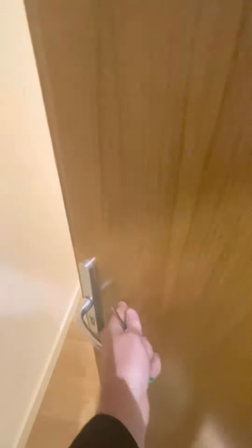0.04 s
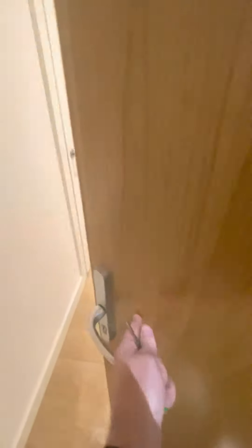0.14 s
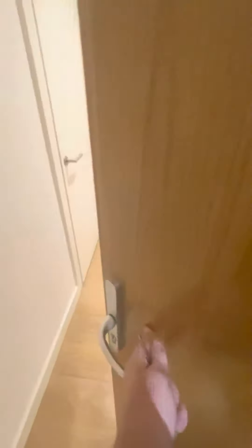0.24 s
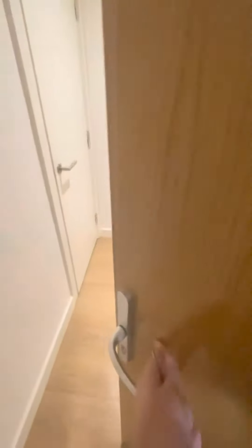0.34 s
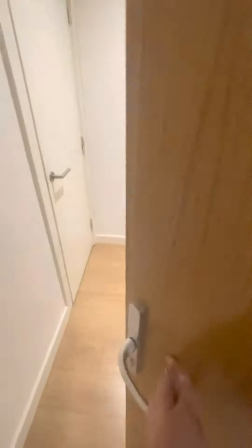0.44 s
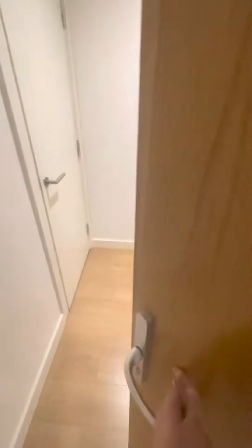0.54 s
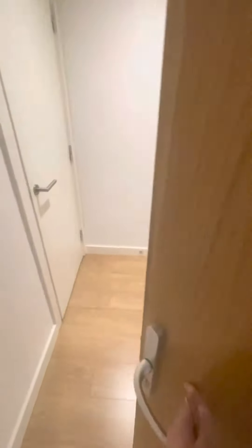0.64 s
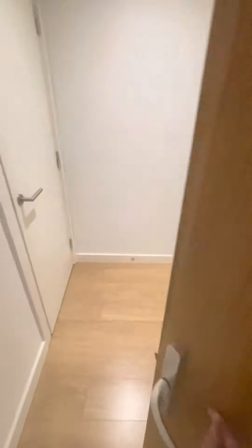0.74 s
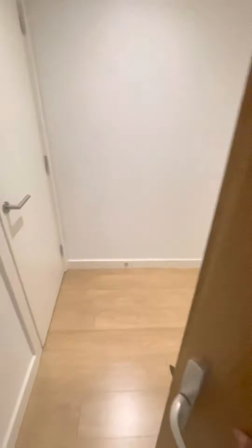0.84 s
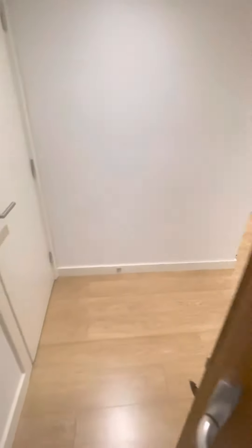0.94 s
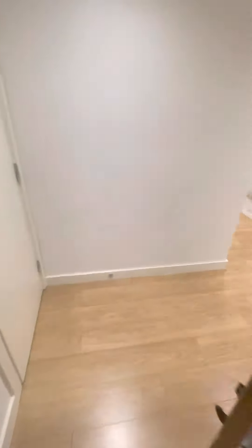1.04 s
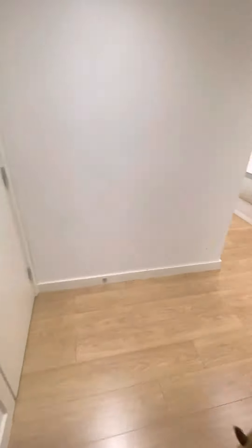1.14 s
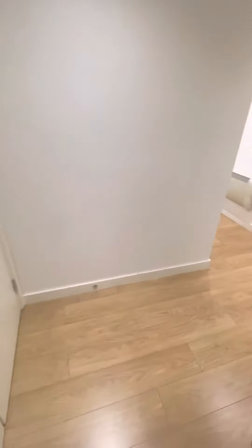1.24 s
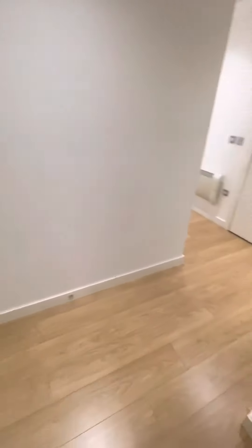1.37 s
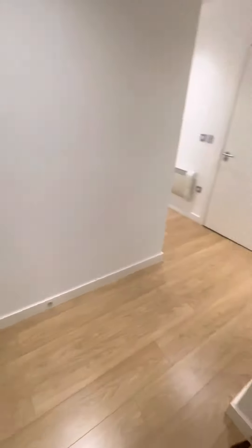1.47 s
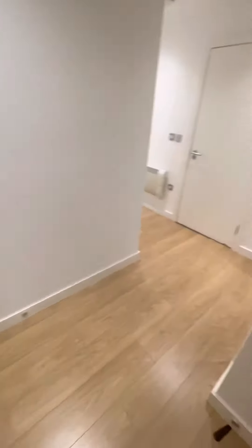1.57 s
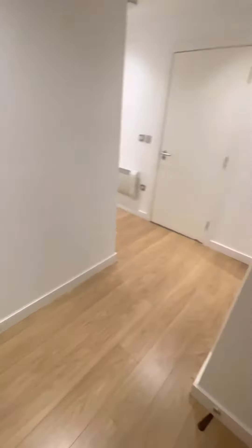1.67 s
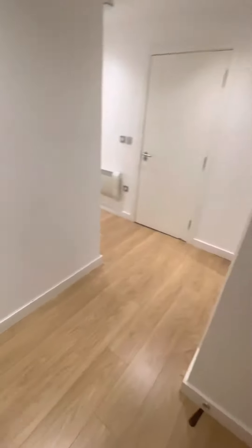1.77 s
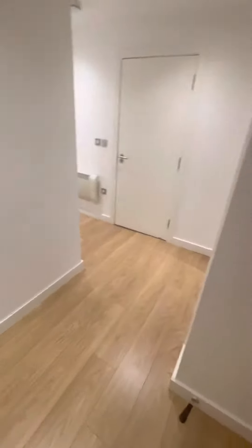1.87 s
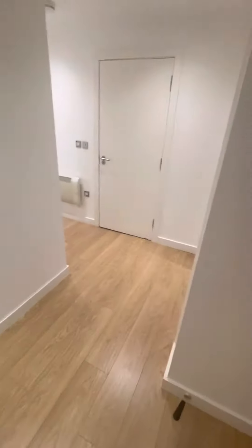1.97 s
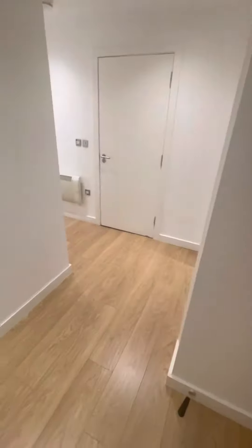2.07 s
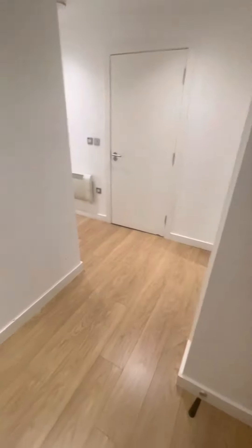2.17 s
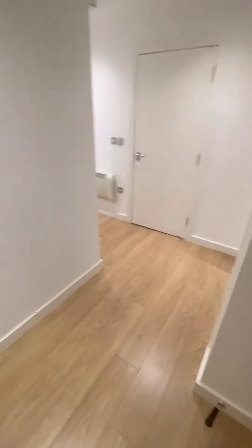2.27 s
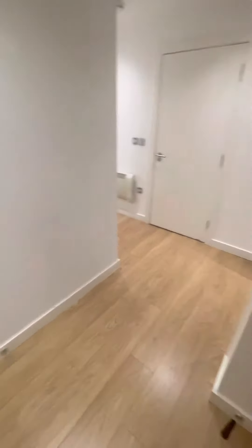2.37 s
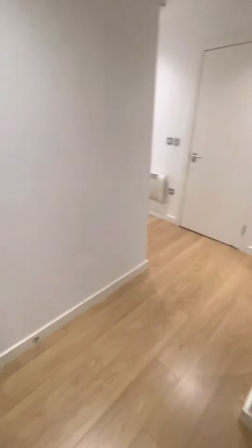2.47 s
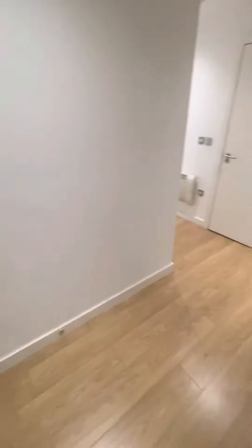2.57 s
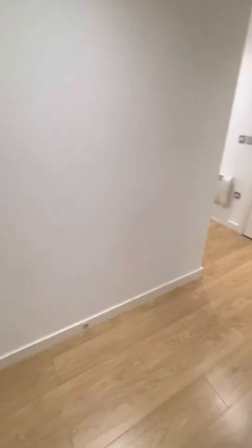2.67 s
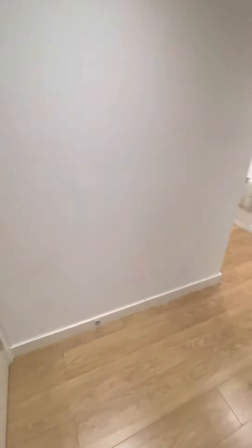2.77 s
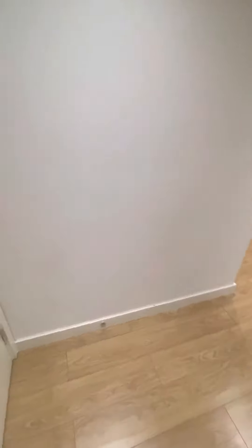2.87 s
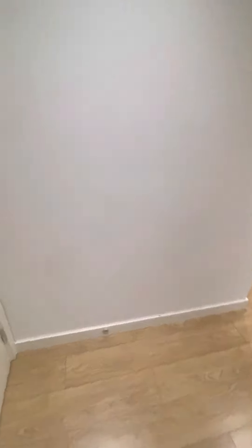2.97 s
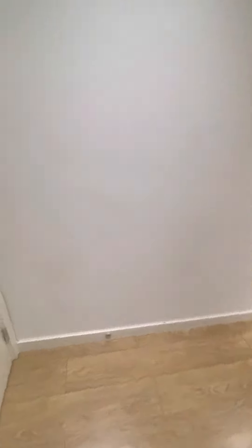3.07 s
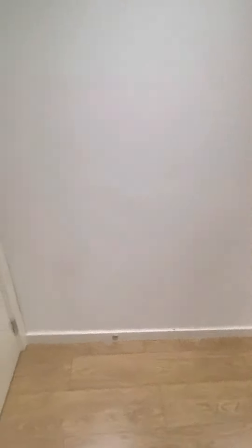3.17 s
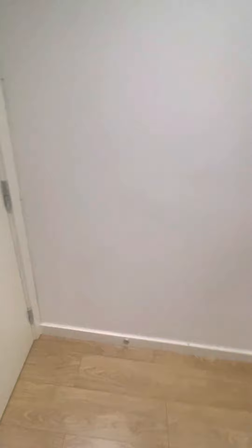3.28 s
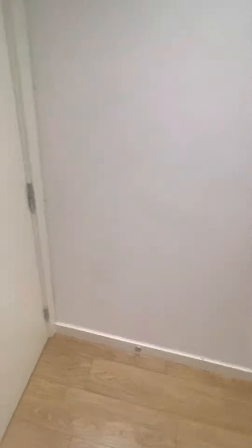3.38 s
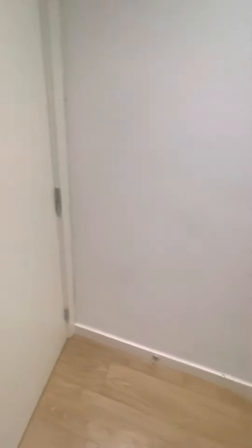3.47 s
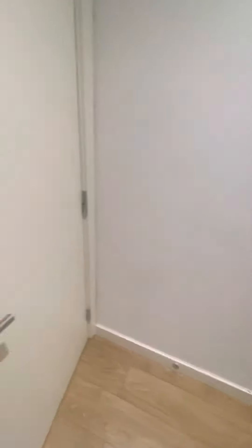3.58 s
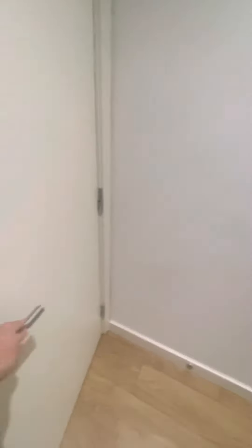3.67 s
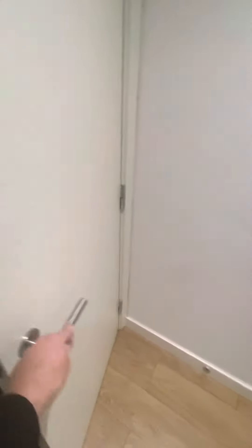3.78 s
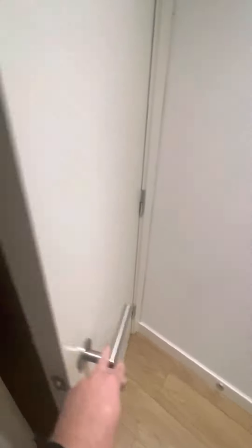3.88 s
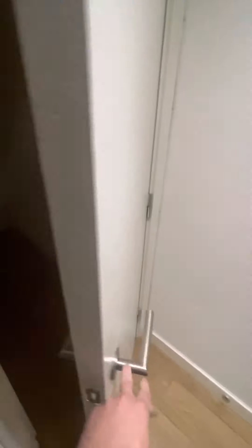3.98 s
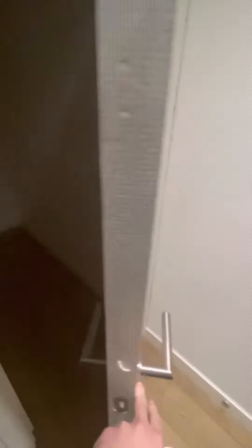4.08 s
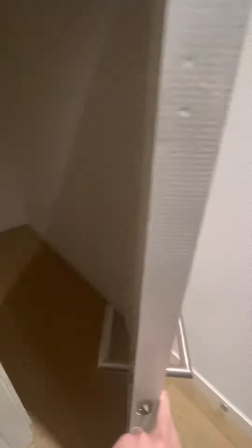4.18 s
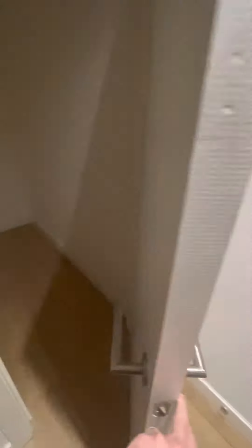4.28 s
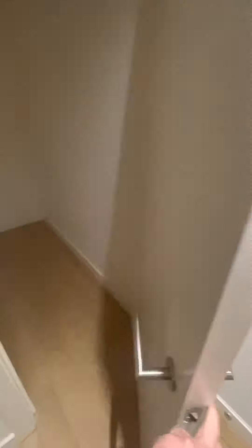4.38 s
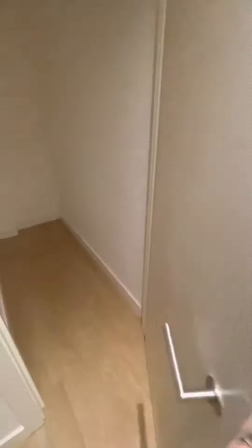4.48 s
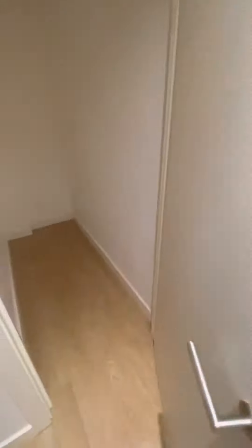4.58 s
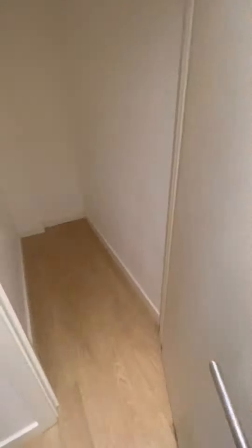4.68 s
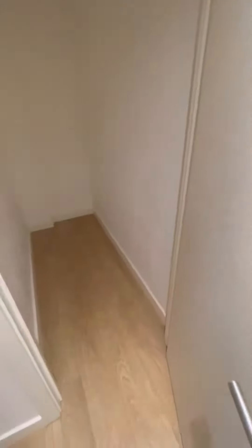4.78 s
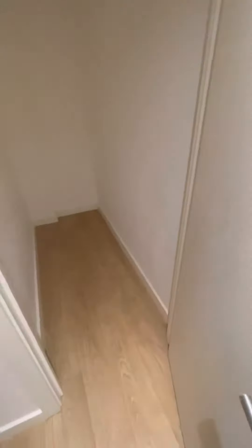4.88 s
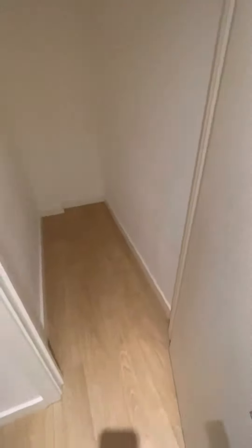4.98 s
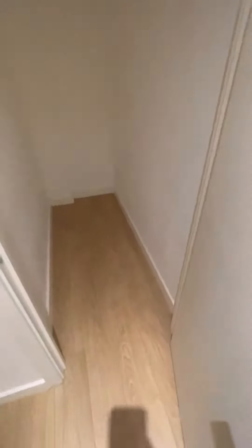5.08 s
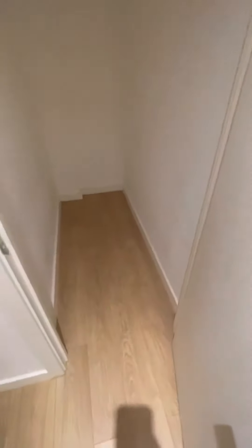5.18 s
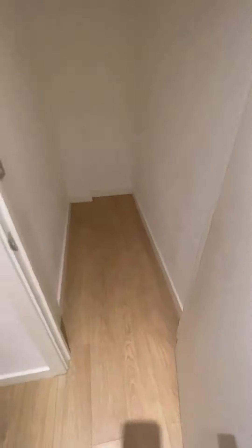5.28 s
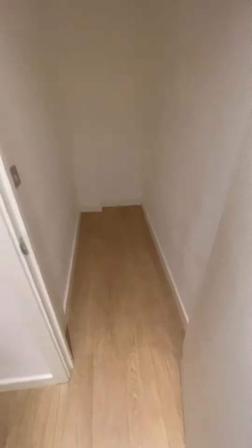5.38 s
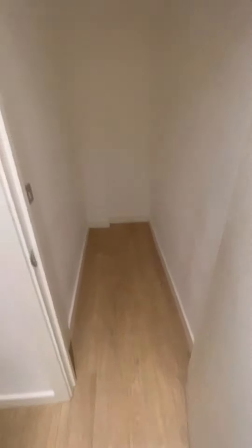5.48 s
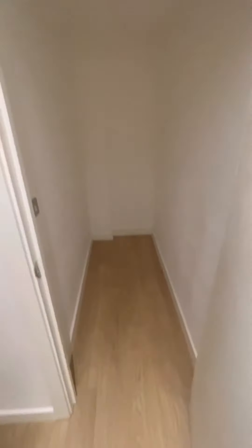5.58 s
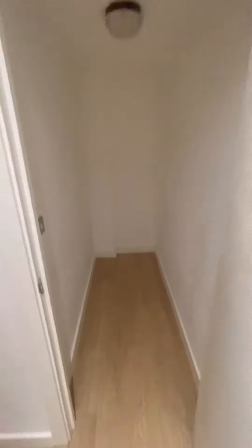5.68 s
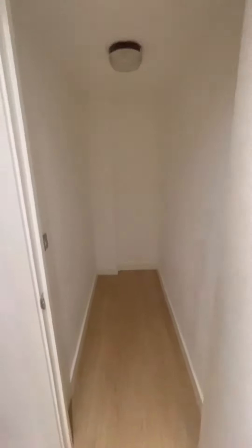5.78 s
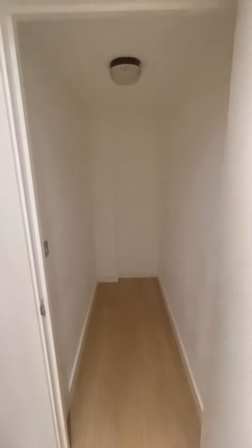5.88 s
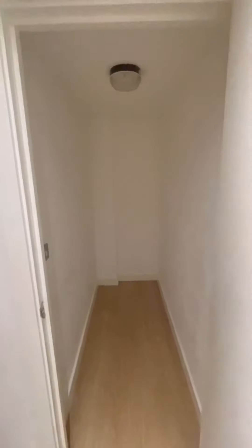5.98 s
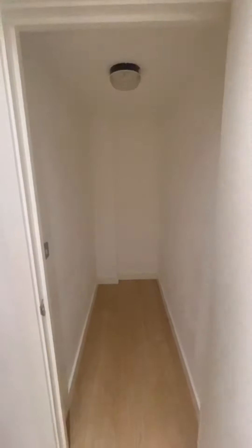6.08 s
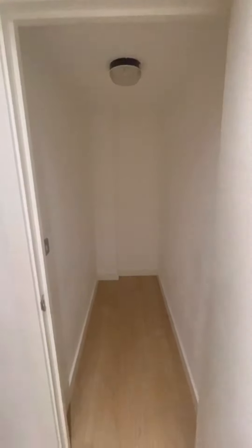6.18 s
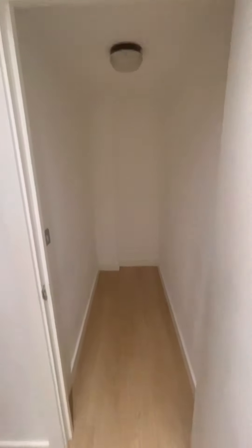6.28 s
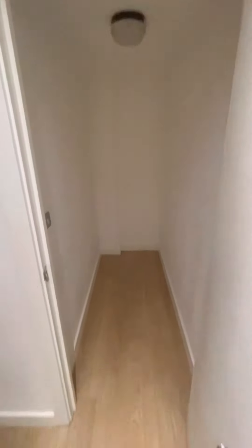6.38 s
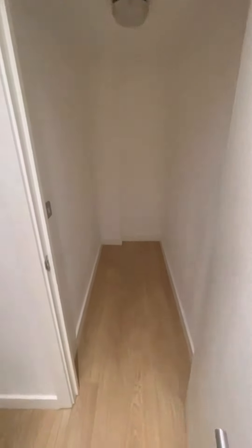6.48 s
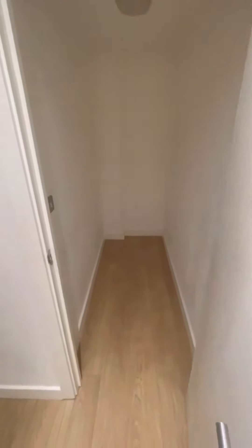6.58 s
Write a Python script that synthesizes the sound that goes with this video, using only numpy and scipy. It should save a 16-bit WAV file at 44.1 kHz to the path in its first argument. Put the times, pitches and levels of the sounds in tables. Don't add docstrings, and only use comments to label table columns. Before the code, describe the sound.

In a bare, slightly echoing hallway, a door latch lets go with a sharp woody clunk and low boom. Light steps, hand thumps and cloth rustle follow. Around the middle a second lever clicks and squeaks, then a heavy door slams with a deep boom, rattling lock parts and a faint key jingle. It drops into its latch and settles to quiet rumble. Close hand-held phone microphone.

```python
import sys
import numpy as np
from scipy import signal
from scipy.fft import rfft, irfft
from scipy.io import wavfile
from scipy.ndimage import uniform_filter1d

SR = 44100
rng = np.random.default_rng(int(sys.argv[2]) if len(sys.argv) > 2 else 0)


def voltage_ratio(decibels):
    exponent = np.asarray(decibels, float) / 20
    return 10 ** exponent


def materialize(psi):
    bounded = np.clip(np.atleast_2d(psi).T, -1, 1)
    quanta = np.round(bounded * 32767).astype(np.int16)
    wavfile.write(sys.argv[1], SR, quanta)


N = 292383
TIME = np.arange(N) / SR
BLOW = int(0.6 * SR)
LEAD_S, HOLD_S = 0.003, 0.01


def evened(x):
    return x / np.sqrt(np.mean(x ** 2) + 1e-20)


def read(points, hz):
    f, *columns = np.transpose(points)
    return np.squeeze([np.interp(np.log(hz + 1), np.log(f + 1), c) for c in columns])


def coloured(x, colour):
    return irfft(rfft(x) * voltage_ratio(read(colour, np.fft.rfftfreq(N, 1 / SR))), N)


def add(mix, s, sound):
    part = mix[max(round(s * SR), 0):][:len(sound)]
    part += sound[:len(part)]


def resonate(x, hz, width_hz):
    r = np.exp(-np.pi * width_hz / SR)
    return 2 * signal.lfilter([1 - r], [1, -r * np.exp(2j * np.pi * hz / SR)], x).real


def steep(x, hz, width_hz):
    return resonate(resonate(x, hz, width_hz), hz, width_hz)


def struck(t60, rise, hold=0.0):
    t = np.arange(BLOW) / SR
    fall = voltage_ratio(-60 * np.maximum(t - hold, 0) / max(t60, 0.005))
    shape = (1 - np.exp(-t / rise)) ** 2 * fall
    return t, shape / shape.max()


def thump(db, hz, t60, noisy, turns=0.15, spread=1.0, second=0.33):
    t, shape = struck(t60, rise=turns / hz)
    phase = 0.17 * rng.random(2)
    tone = np.sin(2 * np.pi * (hz * t + phase[0]))
    tone += second * np.sin(2 * np.pi * (1.5 * hz * t + phase[1]))
    smear = evened(steep(rng.standard_normal(len(t)), hz, spread * hz))
    return voltage_ratio(db) * shape * ((1 - noisy) * tone + noisy * 0.64 * smear)


def ring(db, hz, t60, noisy=0.9):
    return thump(db, hz, t60, noisy, turns=2.3, spread=0.4, second=0)


def boom(db, hz, t60):
    return thump(db, hz, t60, noisy=0.3, second=0.06)


def played(table, voice, send_db, per_db=0.0, per_octave_db=0.0, lead=0):
    direct, send = np.zeros((2, N))
    for s, db, *controls in table:
        sound = voice(db, *controls)
        add(direct, s - lead, sound)
        octaves = np.log2(controls[-1] / 0.08)
        share_db = send_db + per_db * (db + 35) + per_octave_db * octaves
        add(send, s - lead, voltage_ratio(share_db) * sound)
    return np.array([direct, send])


def swelling(table, stop_db=0.0):
    power = np.zeros(N)
    for s, db, rise, fall in table:
        after = TIME - s
        slope = np.maximum(-abs(rise) * after, abs(fall) * after)
        power += voltage_ratio(db - slope - stop_db * after ** 2) ** 2
    return np.sqrt(power)


def lumpy_noise(colour, level, lumps_db):
    slow = uniform_filter1d(uniform_filter1d(rng.standard_normal(N), 900), 900)
    noise = evened(coloured(rng.standard_normal((2, N)), colour))
    return noise * level * voltage_ratio(lumps_db * evened(slow))


# hz, level_db (per Hz)
RUMBLE_COLOUR = [(12, -43.5), (20, -21), (43, -12.5), (65, -2), (83, -19.5), (130, -28.5), (170, -62.5),
                 (290, -120)]
# start_s (of the peak), level_db, rise_db_per_s, fall_db_per_s
AIR_SWINGS = [
    (.38, -43.5, 5, 67),
    (2.02, -57.5, 92, 15.5),
    (3.2, -49.5, 103, 42.5),
    (3.75, -47, 31, 12.5),
    (4.12, -34, 72.5, 59.5),
    (4.72, -38.5, 96, 34),
    (5.85, -58.5, 4.5, 61.5),
]


def rumble():
    return lumpy_noise(RUMBLE_COLOUR, np.hypot(voltage_ratio(-67.5), swelling(AIR_SWINGS)), lumps_db=2)


# hz, level_db (per Hz)
MURMUR_COLOUR = [(53, -34.5), (90, 0.5), (231, 4.5), (333, 0), (426, -6.5), (600, -8.5), (780, -40),
                 (1320, -120)]
# start_s, level_db
EFFORT_CURVE = [(0, -39), (.2, -48), (.48, -50), (.9, -57.5), (1.45, -64.5), (1.86, -52), (2.2, -71),
                (2.64, -60.5), (3.05, -48), (3.29, -51.5), (3.42, -30.5), (3.51, -43.5), (3.821, -48.5),
                (3.95, -29), (4.52, -59), (4.6, -42.5), (5.35, -61.5), (5.55, -78)]


def murmur():
    effort = voltage_ratio(np.interp(TIME, *np.transpose(EFFORT_CURVE)))
    effort = effort * (TIME < EFFORT_CURVE[-1][0])
    return lumpy_noise(MURMUR_COLOUR, np.hypot(effort, voltage_ratio(-80.5)), lumps_db=2.5)


# start_s, level_db
SLEEVE_CURVE = [(0, -55.5), (.9, -59.5), (1.25, -67.5), (1.72, -58), (1.86, -63), (2.16, -70),
                (2.64, -61.5), (3.2, -55), (3.82, -58), (4.5, -73), (4.97, -58.5), (5.4, -67.5),
                (5.6, -79.5), (6.1, -81), (6.48, -86)]


def sleeve():
    return voltage_ratio(np.interp(TIME, *np.transpose(SLEEVE_CURVE)))


# hz, level_db (per Hz)
SCUFF_COLOUR = [(240, -40.5), (400, -6.5), (551, -10), (733, 0), (1020, -0.5), (2200, -10.5), (2860, -30),
                (4840, -120)]
# start_s (of the peak), level_db, rise_db_per_s, fall_db_per_s
SLIDES = [
    (0, -45.5, 90, 200),
    (.6, -87.5, 3.3, 1.9),
    (1.86, -56, 130, 75),
    (3.05, -62.5, 60, 21),
    (3.69, -53.5, 75, 160),
    (4.01, -38, 140, 22.4),
    (4.42, -55, 50, 440),
    (4.6, -43, 170, 15),
    (5.25, -54.5, 29, 170),
]


def scuff():
    return lumpy_noise(SCUFF_COLOUR, np.hypot(voltage_ratio(-4.5) * sleeve(), swelling(SLIDES, stop_db=41)), lumps_db=2)


# hz, level_db (per Hz)
RUSTLE_COLOUR = [(900, -33), (1500, 3), (2120, 3.5), (6340, 1), (8000, -5), (11000, 0.5), (14000, -10),
                 (16000, -0.5)]
# start_s (of the peak), level_db, rise_db_per_s, fall_db_per_s
LOCK_HISS = [
    (3.42, -49, 94.5, 110),
    (3.92, -36, 250, 29.8),
    (4.65, -50, 60.7, 28.5),
    (4.84, -45, 30, 280),
]


def rustle():
    return lumpy_noise(RUSTLE_COLOUR, np.hypot(sleeve(), swelling(LOCK_HISS, stop_db=41)), lumps_db=1)


# start_s, level_db (peak), pitch_hz, t60_s
HAND_AND_HEEL_BLOWS = [(0.019, -38.5, 148, 0.23), (0.119, -29.5, 506, 0.1), (0.213, -17, 240, 0.033),
                       (0.221, -18, 140, 0.084), (0.257, -24.5, 230, 0.06), (0.305, -27.5, 150, 0.039),
                       (0.34, -30, 110, 0.035), (0.47, -37, 300, 0.08), (0.613, -39, 283, 0.12),
                       (0.8, -32, 355, 0.09), (0.969, -41, 371, 0.11), (1.161, -30, 377, 0.038),
                       (1.277, -39.5, 345, 0.085), (1.552, -42, 385, 0.11), (1.608, -54.5, 221, 0.064),
                       (1.801, -29, 423, 0.069), (2.453, -44.5, 148, 0.76), (2.618, -39.5, 160, 0.33),
                       (2.832, -39, 303, 0.14), (2.87, -39, 162, 0.17), (3.03, -38, 240, 0.2),
                       (3.115, -35.5, 230.4, 0.27), (3.307, -47, 191, 0.22), (3.34, -23.5, 178, 0.17),
                       (3.399, -26.5, 398, 0.082), (3.451, -29, 283, 0.018), (3.854, -15, 409, 0.025),
                       (3.88, -16, 110, 0.041), (3.929, -20, 110, 0.025), (4.003, -19.5, 234, 0.074),
                       (4.084, -32.5, 283, 0.31), (4.159, -25.5, 288, 0.084), (4.548, -24.5, 312, 0.11),
                       (4.659, -32, 363, 0.19), (5.151, -32, 380, 0.25), (5.26, -53, 380, 0.06),
                       (5.305, -38, 250, 0.046)]


def hands_and_heels():
    def knock(db, hz, t60):
        return thump(db, hz, t60, noisy=0.54)
    return played(HAND_AND_HEEL_BLOWS, knock, send_db=-5.5, per_db=0.097)


# pitch_hz, width_hz, level_db
EDGE_MODES = [(800, 260, 34.5), (1040, 110, 1.5), (1450, 550, -17.5)]
# pitch_hz, width_hz, level_db
LATCH_MODES = [(1920, 150, 3), (2360, 200, 2), (2787, 61, 2.5), (3200, 300, -4), (3868, 200, 5.5)]
# pitch_hz, width_hz, level_db
TICK_MODES = [(4650, 410, -10), (6040, 1500, -2.5), (8300, 500, 2), (9100, 1400, 4), (12800, 2200, 3.5)]


def body(grit, modes, between_db=5.5, loose=0.04):
    shift, weight = rng.standard_normal((2, len(modes)))
    rings = np.zeros(len(grit))
    for (hz, width_hz, db), u, w in zip(modes, shift, weight):
        moved_hz = hz * (1 + loose * np.tanh(u))
        rings += voltage_ratio(db + 1.1 * w) * steep(grit, moved_hz, 1.3 * width_hz)
    low, high = modes[0][0] * 0.91, min(modes[-1][0] * 0.87, 9000)
    band = signal.butter(2, [low, high], "band", fs=SR, output="sos")
    between = signal.sosfilt(band, grit)
    return evened(evened(rings) + voltage_ratio(between_db) * evened(between))


def click(db, latch_db, tick_db, t60):
    grains_db = 3.5 * rng.standard_normal(BLOW // 60 + 1).repeat(60)[:BLOW]
    grit = rng.standard_normal(BLOW) * voltage_ratio(grains_db)
    edge = body(grit, EDGE_MODES) * struck(1.3 * t60, rise=0.0036, hold=HOLD_S)[1]
    latch = body(grit, LATCH_MODES) * struck(t60, rise=0.004, hold=HOLD_S)[1]
    tick = body(grit, TICK_MODES) * struck(0.82 * t60, rise=0.004, hold=HOLD_S)[1]
    return voltage_ratio(db) * 0.3 * (edge + voltage_ratio(latch_db) * latch + voltage_ratio(tick_db) * tick)


# start_s, level_db (edge peak), latch_db (over edge), small_parts_db (over edge), t60_s
ENTRY_CLICKS = [(0.026, -45.5, 8.5, 11, 0.045), (0.117, -41, -40, -37, 0.021), (0.421, -48, -1, 4, 0.049),
                (0.613, -38.5, -22, -26, 0.34), (0.737, -40, -29, -28.5, 0.012),
                (0.817, -52, 11.5, 13.5, 0.088), (0.983, -45.5, -0.5, 7, 0.034),
                (1.162, -41, -29, -17.5, 0.036), (1.271, -39.5, -10, -44, 0.031),
                (1.718, -54, -14, 0, 0.044), (1.783, -32, -7, -23, 0.054), (1.829, -44, -17, -37, 0.027),
                (2.479, -62.5, 8, 19, 0.033)]


def entry():
    return played(ENTRY_CLICKS, click, send_db=-6.0, per_octave_db=-2.5, lead=LEAD_S)


# start_s, level_db (peak), pitch_hz, t60_s
RINGING_FITTINGS = [(.122, -42, 770, 0.022), (.205, -28, 582, 0.097), (.616, -44.5, 1300, 0.065),
                    (.62, -47.5, 2830, 0.21), (.737, -40.5, 1480, 0.1), (1.165, -43.5, 690, 0.028),
                    (1.272, -41, 1260, 0.056), (1.285, -47, 2870, 0.069), (1.716, -50, 640, 0.15),
                    (1.787, -43.5, 2200, 0.19), (1.826, -30, 1450, 0.024), (4.535, -33.5, 890, 0.05),
                    (3.345, -28.5, 461, 0.091), (3.305, -36.5, 862, 0.32), (3.332, -35, 3570, 0.054),
                    (3.333, -27, 842, 0.13), (3.408, -37, 3893, 0.047), (3.434, -37.5, 4000, .03),
                    (5.012, -40, 3910, 0.1), (5.155, -40.5, 530, 0.23)]


def fittings():
    return played(RINGING_FITTINGS, ring, send_db=-6, lead=LEAD_S)


# start_s, level_db (edge peak), latch_db (over edge), small_parts_db (over edge), t60_s
LATCH_RELEASE = [
    (0.2, -21, -12, -19.5, 0.052),
]


def release():
    return played(LATCH_RELEASE, click, send_db=-7, lead=LEAD_S)


# start_s, level_db (peak), lowest_hz
METAL_SNAPS = [(.2015, -36.5, 600), (.424, -44, 4500), (.819, -36, 3500), (2.478, -57, 2500),
               (3.331, -39, 3000), (3.409, -45, 3200), (3.845, -26, 1500), (3.862, -22, 800),
               (3.877, -31, 1200), (3.932, -30, 3000), (4.005, -27, 1800), (4.074, -35, 3000),
               (4.099, -30, 1500), (4.158, -36, 2500), (4.237, -41, 2000), (4.303, -40.5, 1980),
               (4.533, -36, 1500), (4.557, -33, 1500), (4.572, -35, 1000), (4.657, -42, 1500),
               (4.768, -39, 4000), (4.824, -52, 2500), (5.008, -43, 3000)]


def snaps():
    def snap(db, low_hz):
        t, shape = struck(0.035, rise=0.0005)
        high = signal.butter(2, np.clip(low_hz, 100, 9000), "high", fs=SR, output="sos")
        return voltage_ratio(db) * 0.52 * shape * evened(signal.sosfilt(high, rng.standard_normal(len(t))))
    return played(METAL_SNAPS, snap, send_db=0)[0]


# start_s, level_db (peak), pitch_hz, t60_s
CLEAR_PANELS = [
    (.204, -13, 349, 0.029),
    (2.948, -27.5, 220, 0.08),
]


def panels():
    def panel(db, hz, t60):
        return ring(db, hz, t60, noisy=0.15)
    return played(CLEAR_PANELS, panel, send_db=-4.0, per_db=-0.23)


# start_s, level_db (peak), pitch_hz, t60_s
LEAF_BOOMS = [(0.228, -27.5, 110, 0.16), (0.32, -33, 82.8, 0.35), (1.559, -72, 57, 0.22),
              (1.801, -36, 64.5, 0.33), (2.078, -45.5, 46.3, 0.56), (2.949, -65, 50.6, 0.27),
              (3.356, -38.5, 59.4, 0.78), (3.874, -13, 84.5, 0.25), (3.977, -38, 47.3, 0.52),
              (4.569, -29, 58.7, 0.23), (4.81, -43, 58, 0.21), (5.008, -36, 54.6, 0.24)]


def booms():
    return played(LEAF_BOOMS, boom, send_db=-9.0, per_db=0.2)


# start_s, level_db, pitch_hz, length_s
SQUEAKS = [(.615, -55, 1400, 0.024), (.615, -56, 2800, 0.021), (.74, -53.5, 2200, 0.011),
           (1.27, -59, 1350, .04), (2.478, -69, 3000, .02), (2.83, -52.5, 1480, 0.015),
           (2.83, -58, 2300, 0.019), (2.975, -47.5, 390, 0.071), (3.02, -53, 850, 0.14),
           (3.11, -52, 1700, 0.019), (3.13, -48.5, 400, 0.072), (3.65, -49.5, 1250, 0.0054),
           (3.79, -46.5, 1250, 0.013), (3.85, -33.5, 1000, 0.072), (3.96, -37, 1100, .03),
           (4.535, -47.5, 5200, 0.053), (4.645, -49, 5500, 0.034), (5.015, -56, 3500, 0.062),
           (3.326, -47.5, 2460, 0.028), (3.43, -57.5, 2530, 0.042), (3.597, -44.5, 3500, 0.0046),
           (3.61, -48, 1640, 0.0088), (3.93, -41.5, 3940, 0.012), (4.0, -39, 2460, 0.0073),
           (4.075, -46.5, 3800, 0.092), (4.528, -41.5, 2520, 0.012), (4.555, -45, 2520, 0.036),
           (4.71, -51, 3970, .04), (4.765, -50, 2140, 0.011), (4.82, -53.5, 3820, 0.072),
           (4.84, -49, 1020, 0.035), (5.01, -47.5, 1004, 0.01), (5.037, -50.5, 1245, 0.092),
           (5.04, -57.5, 980, 0.085)]


def rubs():
    def rub(db, hz, length):
        t = np.arange(BLOW // 2) / SR
        shape = np.minimum(t / 0.0043, 1) * voltage_ratio(-900 * np.maximum(t - length, 0))
        return voltage_ratio(db) * shape * evened(steep(rng.standard_normal(len(t)), hz, 0.23 * hz))
    return played(SQUEAKS, rub, send_db=-8)


# start_s, level_db (edge peak), latch_db (over edge), small_parts_db (over edge), t60_s
LEVER_CLICKS = [(2.829, -38, -4.5, -8, 0.046), (3.021, -32.5, -8.5, -25, 0.043),
                (3.079, -49.5, 12.5, 7, 0.013), (3.113, -33, 1.5, -2.5, 0.029),
                (3.165, -38, 3.5, 4.5, 0.03), (3.33, -36, 3.5, -7, 0.04), (3.385, -33, -24, 2.5, 0.02),
                (3.398, -27, -10.5, -17.5, 0.014), (3.454, -34.5, -5, -11.5, 0.057),
                (3.6, -31.5, -7, -6, 0.016), (3.705, -45.5, 0.5, -14.5, 0.14),
                (3.789, -37.5, -1, -28, 0.053)]


def second_lever():
    return played(LEVER_CLICKS, click, send_db=-6.0, per_octave_db=-2.5, lead=LEAD_S)


# pitch_hz, level_db, t60_s
KEY_MODES = [(9450, -10, 0.08), (10550, 1.5, .35), (11420, 0.5, 0.26), (12380, -0.5, 0.33),
             (12730, -10, .15), (14390, 1.5, .35), (14840, -4.5, .1)]
# start_s, level_db (peak)
KEY_KNOCKS = [
    (3.39, -54),
    (3.84, -45.5),
    (3.936, -45),
    (4.006, -51),
    (4.079, -51),
    (4.129, -64),
    (4.533, -49),
    (4.645, -48),
    (4.771, -58),
    (4.838, -77),
]


def keys():
    out, t = np.zeros(N), np.arange(BLOW) / SR
    for s, db in KEY_KNOCKS:
        chance = rng.standard_normal((len(KEY_MODES), 2))
        for (hz, mode_db, t60), (weight, shift) in zip(KEY_MODES, chance):
            blur = 0.11 * np.cumsum(rng.standard_normal(BLOW))
            phase = 2 * np.pi * hz * (1 + 0.0072 * shift) * t + blur
            add(out, s, voltage_ratio(db + mode_db + 3.7 * weight - 60 * t / t60) * np.sin(phase))
    return out


# start_s, level_db (edge peak), latch_db (over edge), small_parts_db (over edge)
SLAM_CLICKS = [(3.833, -29, 3.5, -3), (3.843, -23, 2.5, -4.5), (3.852, -23.5, 1, -3),
               (3.861, -20, -0.5, -3.5), (3.879, -45, -29.5, -14.5), (3.93, -25.5, 1.5, -13),
               (3.998, -33.5, -5, -20), (4.006, -31, 8, -3.5), (4.073, -29, 3, 1), (4.099, -31, -6, -5),
               (4.157, -34.5, 1, -0.5), (4.236, -46.5, 12, -36), (4.302, -34, 1.5, -4),
               (4.372, -39, 1, -26)]


def slam():
    rows = [(*row, 0.14) for row in SLAM_CLICKS]
    return played(rows, click, send_db=-7.5, per_db=0.13, lead=LEAD_S)


# start_s, level_db (peak), pitch_hz, t60_s
LEAF_SWINGS = [
    (3.88, -16, 42.87, 0.59),
    (4.56, -33.5, 45.4, 0.59),
]


def heavy_leaf():
    return played(LEAF_SWINGS, boom, send_db=-9.0, per_db=0.2)


# start_s, level_db (edge peak), latch_db (over edge), small_parts_db (over edge)
SETTLE_CLICKS = [
    (4.527, -30.5, -12, -5.5),
    (4.533, -24, -2.5, -12.5),
    (4.557, -28, 0, -6),
    (4.649, -41.5, 13, 9),
    (4.719, -38, -6, -32.5),
    (4.769, -34.5, -25, -26),
    (4.819, -37, 4, -28),
    (4.943, -44, 4, -43),
    (5.007, -48, 9, 6.5),
    (5.042, -51, 12.5, -15),
]


def settle():
    rows = [(*row, 0.038) for row in SETTLE_CLICKS]
    return played(rows, click, send_db=0.0, lead=LEAD_S)


# hz, t60_s
HALL_DECAY = [(60, 0.88), (250, 0.65), (1000, 0.66), (4000, 0.4), (12000, 0.28)]


def hall(x):
    taps = np.zeros((2, SR))
    at = np.arange(200, SR - 20, 20) + rng.integers(0, 20, (2, (SR - 201) // 20))
    np.put_along_axis(taps, at, rng.choice([-1., 1.], at.shape), 1)
    hz, t, z = signal.stft(taps, SR, nperseg=256)
    decay = voltage_ratio(-60 * t / read(HALL_DECAY, hz)[:, None])
    tail = signal.istft(z * decay, SR, nperseg=256)[1]
    return signal.fftconvolve(x[None], tail / np.linalg.norm(tail[0]), axes=1)[:, :N]


def scene():
    around = rumble() + murmur() + scuff() + rustle()
    direct, send = (hands_and_heels() + entry() + fittings() + release() + panels() + booms() + rubs()
                    + second_lever() + keys() + slam() + heavy_leaf() + settle())
    around = around + hall(send)
    direct = direct + snaps()
    bend = rng.standard_normal(256) * voltage_ratio(-np.arange(256) * 0.031)
    bent = signal.oaconvolve(direct, bend / np.linalg.norm(bend))[:N]
    return np.array([direct, voltage_ratio(-1.0) * bent]) + around


def starved(pair, margin_db=7, from_hz=8300, loud_slope=0.14, masked_db=22, mask_slope=0.65, release_db=0.94):
    hz, _, z = signal.stft(pair, SR, nperseg=2048, window="cosine")
    power = abs(z[:, :1024]) ** 2
    band_power = power.reshape(2, 64, 16, -1).mean(2).repeat(16, 1)
    band_db = 10 * np.log10(band_power + 1e-20)
    loud_db = 10 * np.log10(power.sum((0, 1)) + 1e-20)
    now_db = 10 * np.log10(power[0, 186:372].mean(0) + 1e-20)
    fall = release_db * np.arange(len(now_db))
    treble_db = np.maximum.accumulate(now_db + fall) - fall
    sum_only = np.array([1, 0])[:, None, None]
    keep = band_db > band_db[::-1] - margin_db + loud_slope * (loud_db + 60) * sum_only
    keep[0] &= band_db[0] > treble_db - masked_db + mask_slope * (treble_db + 89)
    z[:, :1024] *= keep | (hz[:1024, None] < from_hz)
    return signal.istft(z, SR, nperseg=2048, window="cosine")[1][:, :N]


def low_pass(x):
    return signal.sosfilt(signal.butter(12, 16020, fs=SR, output="sos"), x)


# hz, level_db
PORT_SUM = [(30, -1.5), (7600, 0.97), (8500, -5.5), (9400, -2), (10000, -15), (11200, -8.5), (13000, 0),
            (15300, -6.5), (16200, -25)]
# hz, level_db
PORT_DIFFERENCE = [(99, -16), (200, -8), (450, 1.5), (740, 7), (1220, 1.5), (3330, 3.5), (8000, 1),
                   (13000, -2.5), (13800, -39.5)]
# hz, in_step_share, quarter_turn_share
PORT_LINK = [(60, -.6, .3), (130, -.88, .2), (380, -.88, .2), (560, 0, .75), (1400, 0, .3), (5000, 0, .25),
             (10000, 0, .5), (14000, 0, .6)]


def record(dry):
    hz = np.fft.rfftfreq(N, 1 / SR)
    in_step, quarter = np.clip(read(PORT_LINK, hz), -0.95, 0.95)
    free = np.sqrt(np.clip(1 - in_step ** 2 - quarter ** 2, 0, 1))
    total, other = rfft(dry)
    side = voltage_ratio(read(PORT_DIFFERENCE, hz)) * ((in_step + 1j * quarter) * total + free * other)
    total = total * voltage_ratio(read(PORT_SUM, hz))
    total, side = starved(irfft(np.array([total, side]), N))
    return low_pass(np.array([total + side, total - side]))


dry = scene()
out = record(dry)
materialize(out)
```